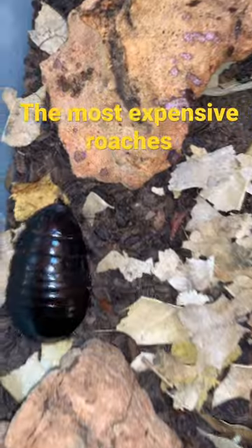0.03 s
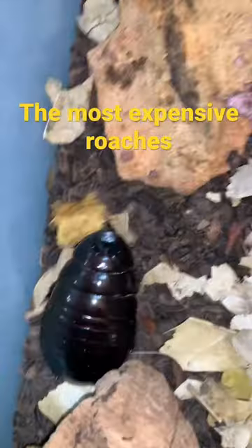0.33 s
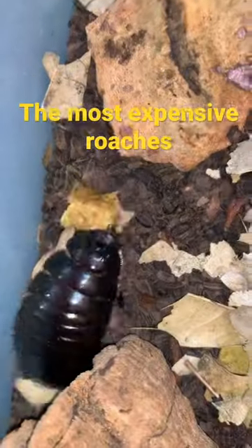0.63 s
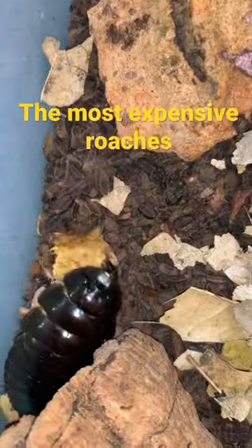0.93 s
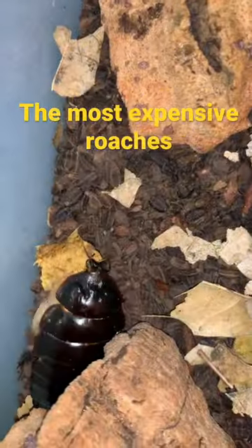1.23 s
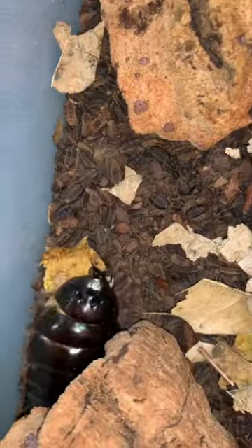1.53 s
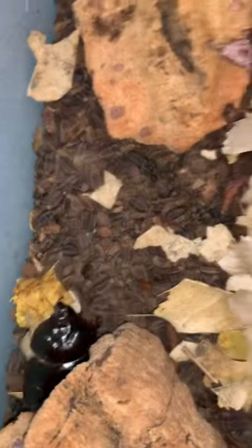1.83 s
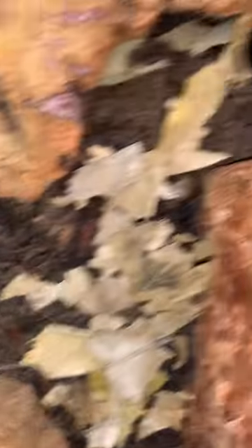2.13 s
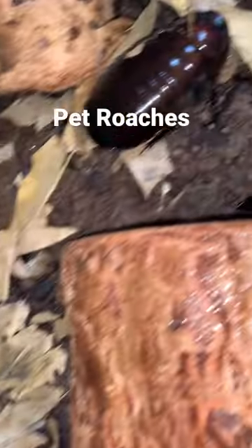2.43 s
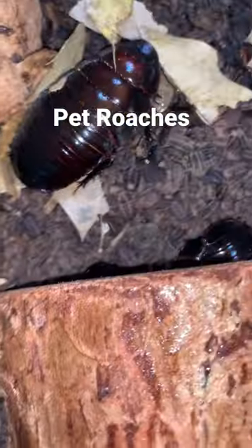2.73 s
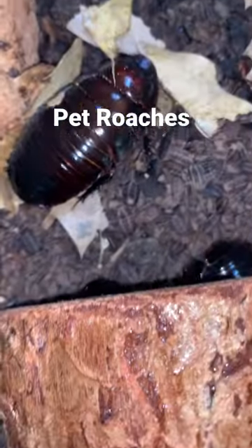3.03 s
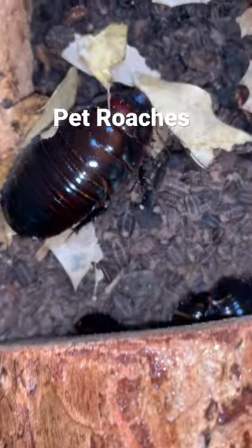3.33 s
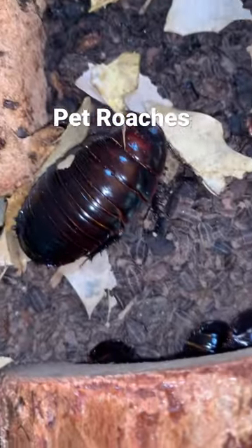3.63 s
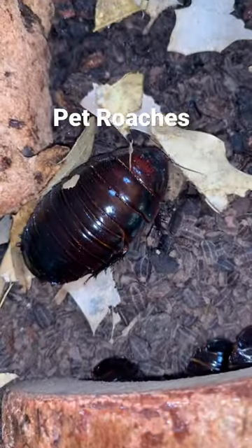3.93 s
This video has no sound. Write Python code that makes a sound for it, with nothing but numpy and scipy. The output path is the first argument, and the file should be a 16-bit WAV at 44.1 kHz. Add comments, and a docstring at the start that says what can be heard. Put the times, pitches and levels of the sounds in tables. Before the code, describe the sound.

A large insect crawls over soil and dry leaves, crackling and clicking over ventilation hum.

```python
"""Roach in a plastic tub

A large roach crawls over bark soil and dry leaves, close to a handheld camera; two low thumps at the start.
Its spiny legs crackle the litter, snap leaf edges, squeak on leaves, and scrape and tap so the tub rings.
After two seconds the camera moves to a quieter roach. Room ventilation hums throughout."""
import sys
import numpy as np
from scipy import signal
from scipy.fft import rfft, irfft, next_fast_len
from scipy.io import wavfile
from scipy.ndimage import map_coordinates

SR = 44100
rng = np.random.default_rng(int(sys.argv[2]) if len(sys.argv) > 2 else 0)


def bounce(signal):
    """Save signal as a 16-bit WAV file at the path given by the first command-line argument."""
    frames = np.transpose(np.atleast_2d(signal))
    limited = np.clip(frames, -1, 1)
    pcm = np.round(limited * 32767).astype(np.int16)
    wavfile.write(sys.argv[1], SR, pcm)


N = 176400
TOP_HZ = 16300

# Stereo image of the litter. Each row: frequency in Hz, left-right correlation.
LITTER_CORRELATION = [(1000, 0.047), (2500, 0.18), (6000, 1)]


def amp(db):
    """Decibels to gain."""
    return 10 ** (np.asarray(db) / 20)


def unit(x):
    """Scale to rms 1."""
    return x / np.sqrt(np.mean(x ** 2) + 1e-20)


def along(points, hz):
    """Interpolate (Hz, value) points on a log axis."""
    f, v = np.transpose(points)
    return np.interp(np.log(hz + 1), np.log(f + 1), v)


def hump(hz, centre_hz, width_oct):
    """Gaussian band in log frequency."""
    return np.exp(-.5 * (np.log2((hz + 1) / centre_hz) / width_oct) ** 2)


def clock():
    """Sample times in seconds."""
    return np.arange(N) / SR


def wobble(knots_per_s):
    """Smooth random curve."""
    knots = rng.standard_normal(int(N * knots_per_s / SR) + 4)
    return map_coordinates(knots, [clock() * knots_per_s])


def filtered(x, response):
    """Apply response(hz) by padded FFT."""
    n = x.shape[-1]
    m = next_fast_len(n + min(n, 8192))
    return irfft(rfft(x, m) * response(np.fft.rfftfreq(m, 1 / SR)), m)[..., :n]


def coloured(pair, spectrum, correlation):
    """Two independent signals to stereo of rms 1 with this spectrum and correlation."""
    def mid_side_gain(hz):
        angle = np.arccos(np.clip(along(correlation, hz), -1, 1)) / 2
        return amp(along(spectrum, hz)) * [np.cos(angle), np.sin(angle)]
    mid, side = filtered(pair, mid_side_gain)
    return unit(np.array([mid + side, mid - side]))


def add(track, start_s, sound):
    """Mix a sound into the track."""
    part = track[..., round(start_s * SR):][..., :sound.shape[-1]]
    part += sound[..., :part.shape[-1]]


def tone(hz, db, waver_db, phase_rad=0, drift_hz=2.19):
    """Sine with unsteady level and pitch."""
    gain = amp(db + waver_db * wobble(16))
    return gain * np.sin(2 * np.pi * np.cumsum(hz + drift_hz * wobble(16)) / SR + phase_rad)


def ventilation(move_s=(2.18, 2.68)):
    """Rushing air, fan hum and thin motor whine; their colour shifts as the camera moves."""
    # Air noise. Each row: frequency in Hz, relative level in dB.
    air_spectrum = [(20, -43), (42, -12.5), (70, -9), (92, -7), (115, 1), (145, -7), (240, -0.5),
                    (310, -11), (400, -8), (500, -11), (570, -25), (720, -24.5), (1100, -21), (1500, -27.5),
                    (2600, -32.5), (4600, -40), (8500, -61), (16000, -62.5)]
    # Each row: frequency in Hz, left-right correlation.
    air_correlation = [(150, 0.96), (350, 0.95), (1000, 0.84), (2000, 0.61), (6000, 1)]
    # Air colour after the move. Each row: frequency in Hz, relative gain in dB.
    moved_eq = [(70, -3), (420, 3.5), (700, 0), (1300, 2.25), (2400, -4), (5000, 0)]
    # Fan and motor tones. Each row: frequency in Hz, level in dB before the move, level in dB after.
    fan_tones = [(78.3, -49.5, -56), (118.1, -50, -50), (169.8, -48.5, -49.5), (205.8, -47.5, -49.5),
                 (287.1, -53, -56), (339.6, -55.5, -53)]
    motor_tones = [(804, -69, -93), (964.4, -63.5, -69.5), (983.5, -61.5, -70), (1302, -75, -71)]
    fade = lambda before, after: np.interp(clock(), move_s, [before, after])
    air = amp(-43.5) * coloured(rng.standard_normal((2, N)), air_spectrum, air_correlation)
    moved_air = filtered(air, lambda hz: amp(along(moved_eq, hz)))
    hum = sum(tone(hz, fade(*db), waver_db=3) for hz, *db in fan_tones)
    stereo_rad = np.array([[2.72], [0]])
    whine = sum(tone(hz, fade(*db), waver_db=4.5, phase_rad=stereo_rad) for hz, *db in motor_tones)
    return fade(1, 0) * air + fade(0, 0.97) * moved_air + hum + whine


def grains(per_band_per_s, spread_db, band_hz=1100, clump_db=4.5):
    """Tiny fractures: impulses ringing in separate bands, loud in clumps, a few far above the rest."""
    centres_hz = np.arange(0, TOP_HZ, band_hz)[:, None, None]
    shape = (len(centres_hz), 1, N)
    clumps = np.array([[wobble(70)] for _ in centres_hz])
    size = amp(spread_db * np.minimum(rng.exponential(size=shape), 4) + clump_db * np.minimum(clumps, 2))
    fires = rng.random(shape) < per_band_per_s / SR
    impulses = fires * size * rng.choice([-1, 1], (len(centres_hz), 2, N))
    return filtered(impulses, lambda hz: np.exp(-2 * ((hz - centres_hz) / band_hz) ** 2)).sum(axis=0)


def crawling(flutter_db=3):
    """Fine litter crackle that follows how busily the legs move."""
    # Leg activity. Each row: time in seconds, level in dB.
    activity = [(.04, -65.5), (.26, -65.5), (.42, -64), (.52, -78), (.62, -61), (.8, -61), (.9, -66),
                (1.08, -65), (1.14, -56), (1.32, -56), (1.43, -66.5), (1.53, -57), (1.7, -60),
                (1.88, -62.5), (2.03, -57), (2.14, -69.5), (2.28, -64), (2.42, -70), (2.87, -72),
                (3.1, -72.5), (3.82, -77.5), (3.92, -67)]
    # Each row: frequency in Hz, relative level in dB.
    crackle_spectrum = [(700, 0), (1600, 0), (2350, 0.5), (5000, -2.5), (7600, -1.5), (10500, -10),
                        (12200, -12), (14800, -13.5), (16000, -22)]
    level_db = np.interp(clock(), *np.transpose(activity)) + flutter_db * wobble(45)
    fractures = grains(per_band_per_s=480, spread_db=3)
    return amp(level_db) * coloured(fractures, crackle_spectrum, LITTER_CORRELATION)


def leaf_snaps(t60_s=0.007, crack_hz=6760, crack_db=-9.5):
    """A leaf edge gives way: a pitched mono burst plus a broader stereo crack."""
    # Each row: start in seconds, level in dB, pitch in Hz.
    snaps = [(0.0743, -48, 7300), (.109, -52.5, 8300), (0.1814, -36, 8300), (0.1968, -40, 7500),
             (.28, -50, 6700), (0.353, -46, 7400), (0.565, -43, 8950), (0.8178, -30, 10700),
             (0.8623, -36.5, 6700), (0.974, -41, 8300), (.999, -38.5, 7700), (1.0088, -43, 7800),
             (1.017, -38, 7560), (1.066, -43, 7600), (1.1069, -42.5, 9100), (1.1221, -37, 9600),
             (1.135, -35.5, 10200), (1.29, -43, 8300), (1.3027, -39.5, 7800), (1.4484, -40.5, 10000),
             (1.509, -32, 9100), (1.594, -44, 9100), (1.639, -39.5, 8000), (1.8565, -47, 7000),
             (2.0189, -38.5, 4970), (2.0751, -37.5, 9700), (2.256, -46, 9400), (2.2713, -44.5, 6940),
             (2.289, -46.5, 9900), (2.448, -48, 10300), (2.558, -53.5, 7000), (2.595, -50.5, 6250),
             (2.838, -55, 6400), (2.935, -51, 5700), (3.048, -50.5, 8600), (3.9037, -51, 10600),
             (3.917, -52, 10000), (3.969, -48, 6100)]
    out, t = np.zeros((2, N)), np.arange(1024) / SR
    lead = 64  # samples of room for filter pre-ring
    for start_s, db, pitch_hz in snaps:
        burst = rng.standard_normal((3, len(t))) * amp(-60 * t / t60_s)
        burst = np.pad(burst, ((0, 0), (lead, 0)))
        ring = filtered(burst[0], lambda hz: hump(hz, pitch_hz, width_oct=0.37))
        crack = filtered(burst[1:], lambda hz: hump(hz, crack_hz, width_oct=0.59))
        snap = ring + amp(crack_db) * crack
        rms_over_2ms = np.sqrt(np.sum(snap ** 2) / (SR * 0.002))
        add(out, start_s - lead / SR, amp(db) * snap / rms_over_2ms)
    return out


def low_pulses():
    """Two low thumps at the start; a faint, soft 367 Hz swell near 3.2 s."""
    # Each row: centre in seconds, peak in dB, pitch in Hz, Gaussian sigma in seconds.
    pulses = [(.075, -23.5, 64.7, 0.01), (.104, -37.5, 115, 0.013), (3.22, -42.5, 367, 0.017)]
    out = np.zeros(N)
    for centre_s, db, hz, sigma_s in pulses:
        t = clock() - centre_s
        out += amp(db) * np.exp(-.5 * (t / sigma_s) ** 2) * np.cos(2 * np.pi * hz * t)
    return out


def tub_ring(t60_s=.036, scatter=.03):
    """Impulse response of the tub, energy 1 per channel; modes shift with the place of contact."""
    # Each row: frequency in Hz, relative level in dB.
    modes = [(850, 1), (1020, -2), (1250, 0), (1750, -1.5), (2250, -0.5), (2580, -3.5), (3800, -11)]
    t = np.arange(SR // 10) / SR
    hz, db = np.transpose(modes)[..., None]
    hz = hz * (1 + scatter * rng.standard_normal(hz.shape))
    phase_rad = rng.uniform(0, 2 * np.pi, (2, len(modes), 1))
    envelope = amp(db - 60 * t / t60_s) * (1 - np.exp(-2 * hz * t))
    ring = np.sum(envelope * np.sin(2 * np.pi * hz * t + phase_rad), axis=1)
    return unit(ring) / np.sqrt(len(t))


def scrapes(slips_per_s=700, rise_share=0.47):
    """Legs and belly drag in swells of uneven slips: leaves crackle and the tub resounds."""
    # Each row: start in seconds, length in seconds, tub level in dB, crackle level in dB.
    drags = [(0.163, 0.062, -53, -58.5), (0.633, 0.064, -53, -56.5), (0.722, 0.063, -54.5, -54.5),
             (0.956, 0.085, -53, -58), (1.188, 0.032, -47.5, -46), (1.345, 0.022, -53, -57.5),
             (1.481, 0.051, -69, -50), (1.609, 0.043, -46, -50), (1.652, 0.058, -54.5, -57),
             (1.74, 0.071, -56.5, -56), (1.946, 0.22, -60, -84)]
    # Each row: frequency in Hz, relative level in dB.
    leaf_spectrum = [(2500, -11), (5000, -11.5), (8000, -5), (11000, -15), (16000, -25)]
    tub, leaf_gain = np.zeros((2, N)), np.zeros(N)
    t = np.arange(SR // 4) / SR
    for start_s, length_s, tub_db, leaf_db in drags:
        swell = np.sqrt(np.interp(t / length_s, [0, rise_share, 1], [0, 1, 0]))
        slips = (rng.random(len(t)) < slips_per_s / SR) * rng.standard_normal(len(t))
        body = signal.fftconvolve([swell * slips], tub_ring(), axes=1)
        swell_rms = np.sqrt(np.sum(swell ** 2) / body.shape[1])
        add(tub, start_s, amp(tub_db) * unit(body) * swell_rms)
        add(leaf_gain, start_s, amp(leaf_db) * swell)
    fractures = grains(per_band_per_s=1700, spread_db=2.5)
    return tub + leaf_gain * coloured(fractures, leaf_spectrum, LITTER_CORRELATION)


def foot_taps(click_decay_s=0.0022, click_hz=1590, click_gain=0.44):
    """Knocks on the tub: dull contact click, brief ring. Most are a foot striking it; those at 0.28, 0.565,
    0.975 and 2.019 s fall with leaf snaps and give them a low body."""
    # Each row: start in seconds, peak in dB.
    taps = [(0.179, -31.5), (.28, -43), (.565, -43), (0.975, -37), (1.179, -32.5), (1.301, -35.5),
            (1.766, -38.5), (1.857, -39), (2.019, -39.5), (2.933, -46.5), (3.138, -46), (3.226, -42),
            (3.41, -37), (3.474, -42)]
    out = np.zeros((2, N))
    for start_s, db in taps:
        ring = tub_ring()
        t = np.arange(ring.shape[1]) / SR
        burst = rng.standard_normal(ring.shape) * np.exp(-t / click_decay_s)
        click = filtered(burst, lambda hz: hump(hz, click_hz, width_oct=1))
        knock = unit(ring) + click_gain * unit(click)
        add(out, start_s, amp(db) * knock / np.abs(knock).max())
    return out


def leg_squeaks(start_hz=2514, sag_hz_per_s=13500, jitter_hz=80):
    """Stick-slip on a leaf: a short rough tone that sags as the leg slows."""
    # Each row: start in seconds, length in seconds, peak in dB.
    squeaks = [(1.191, 0.022, -40), (1.216, 0.013, -46.5), (1.506, 0.012, -40), (1.757, 0.021, -45)]
    stereo_rad = np.array([[1.63], [0]])
    out = np.zeros((2, N))
    for start_s, length_s, db in squeaks:
        t = np.arange(round(length_s * SR)) / SR
        hz = start_hz - sag_hz_per_s * t + jitter_hz * wobble(950)[:len(t)]
        envelope = amp(db) * np.sin(np.pi * t / length_s)
        add(out, start_s, envelope * np.sin(2 * np.pi * np.cumsum(hz) / SR + stereo_rad))
    return out


def shell_rub(start_s=3.784, rise_s=0.26, centre_hz=4620, level_db=-68.5):
    """The shell slides on a leaf with a faint, hissy squeak."""
    band = filtered(rng.standard_normal((2, N)), lambda hz: hump(hz, centre_hz, width_oct=.08))
    return amp(level_db) * np.clip((clock() - start_s) / rise_s, 0, 1) * unit(band)


def wall_echoes(x, t60_s=0.062, rise_s=0.00023):
    """Short, dense reflections inside the tub."""
    t = np.arange(SR // 10) / SR
    tail = rng.standard_normal((2, len(t))) * amp(-60 * t / t60_s) * (1 - np.exp(-t / rise_s))
    return signal.fftconvolve(x, tail / np.linalg.norm(tail[0]), axes=1)[:, :N]


def scene():
    """Roach in its tub, room ventilation, low pulses."""
    roach = crawling() + scrapes() + leg_squeaks() + shell_rub() + leaf_snaps() + foot_taps()
    return roach + amp(-8.5) * wall_echoes(roach) + ventilation() + low_pulses()


def stereo_widening(hz):
    """Left-right phase shift varying with frequency, bass leaning right."""
    # Each row: frequency in Hz, left minus right in dB.
    balance = [(50, 0), (200, -7), (330, -12.5), (490, 0)]
    # Each row: frequency in Hz, left phase lead in radians.
    phase_lead = [(280, -.25), (470, -3.2), (1300, -4.1), (3000, -3.5), (4000, -4.1), (5200, -2.9),
                  (7800, -.1), (9500, .3), (12000, 3.1), (13500, 3.5), (15500, 6.1)]
    sides = np.array([[.5], [-.5]])
    gain = amp(sides * along(balance, hz))
    gain /= np.sqrt(np.mean(gain ** 2, axis=0))
    return gain * np.exp(1j * sides * along(phase_lead, hz))


def record(dry):
    """Sound fades in quickly after 36 ms of silence; the stereo image widens and the recorder cuts off above
    its band limit."""
    start_s, rise_s = .036, .002
    gate = np.clip((clock() - start_s) / rise_s, 0, 1)
    return filtered(filtered(dry, stereo_widening) * gate, lambda hz: hz < TOP_HZ)


dry = scene()
out = record(dry)
bounce(out)
```